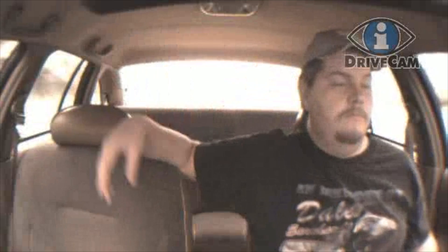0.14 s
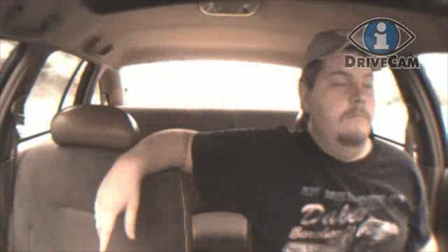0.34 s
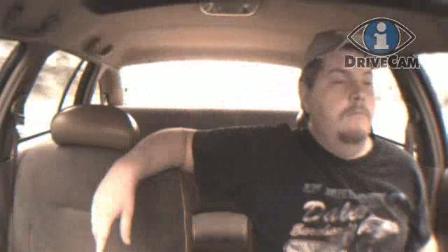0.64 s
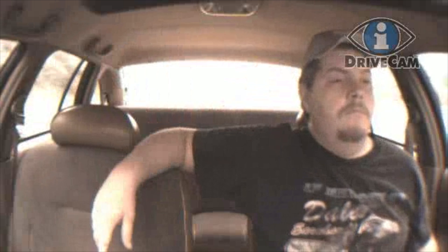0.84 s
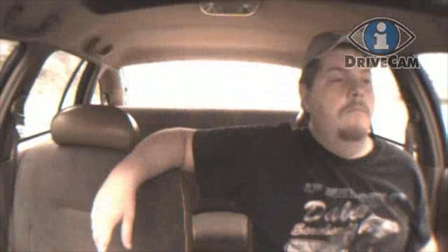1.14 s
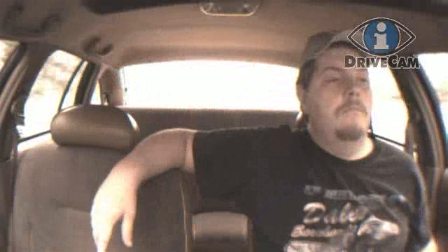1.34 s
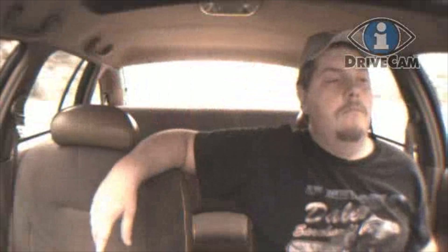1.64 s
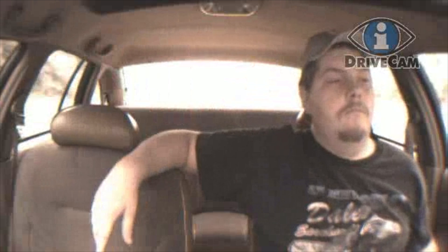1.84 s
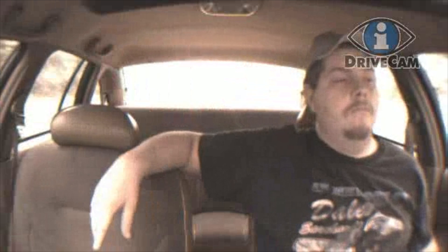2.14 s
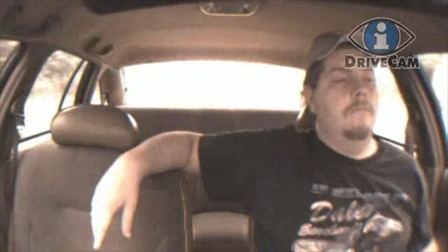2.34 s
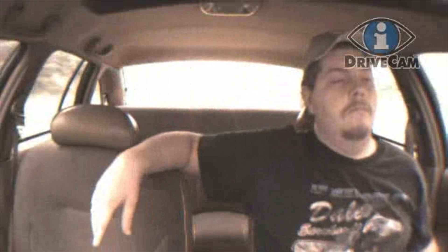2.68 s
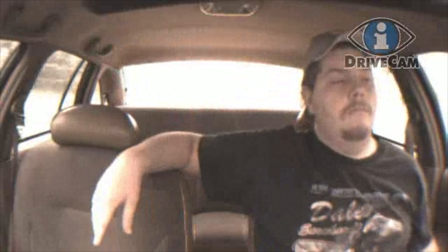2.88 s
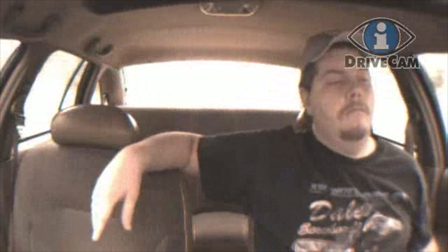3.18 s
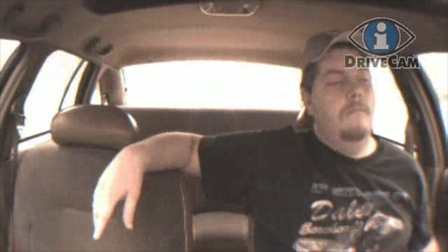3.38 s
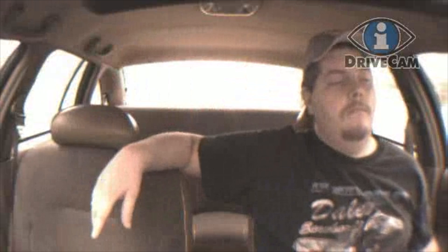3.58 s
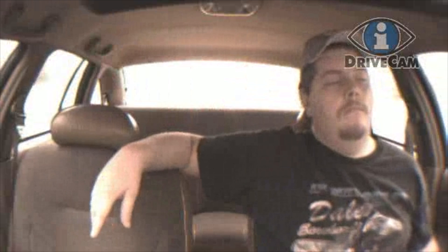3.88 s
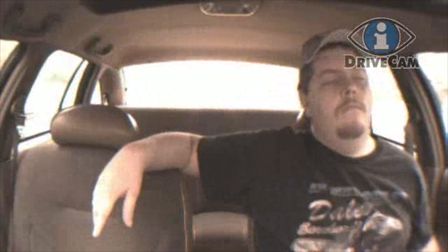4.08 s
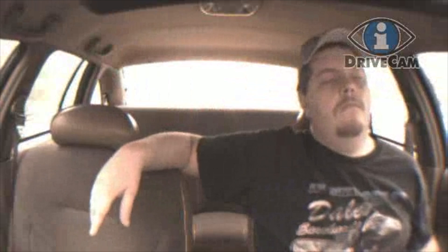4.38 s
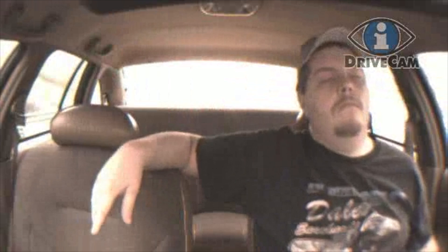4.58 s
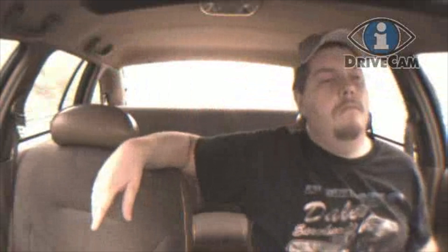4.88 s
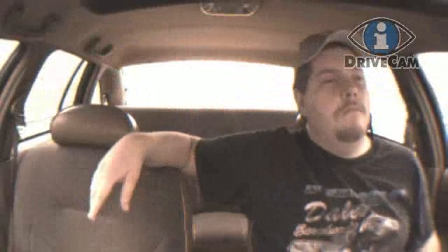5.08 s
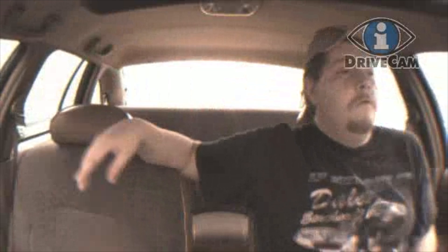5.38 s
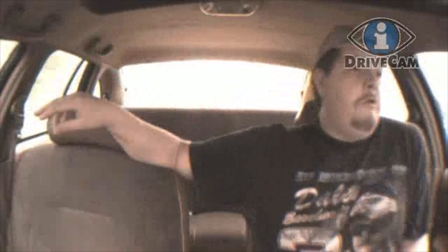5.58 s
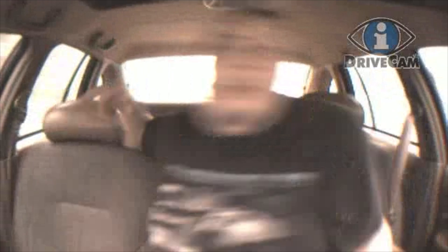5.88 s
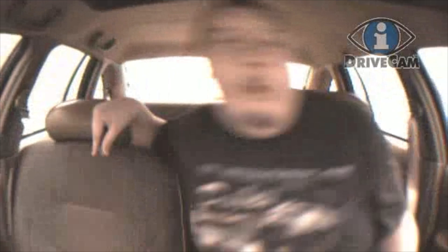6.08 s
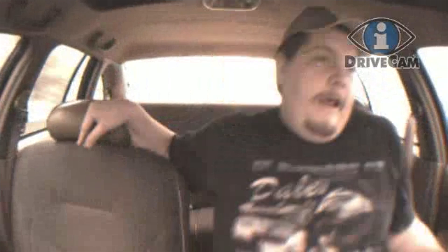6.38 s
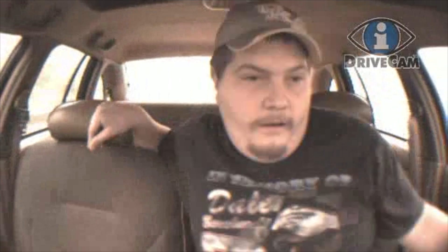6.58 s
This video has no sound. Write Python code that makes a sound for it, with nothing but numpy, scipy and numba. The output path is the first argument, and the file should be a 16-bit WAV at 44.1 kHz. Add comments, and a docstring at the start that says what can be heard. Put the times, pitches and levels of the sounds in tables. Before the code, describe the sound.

From the start, a steady low roar of tyres and wind fills a car cabin, with a faint tread whine. It grows slightly rougher near 4.7 seconds, and loose trim gives a few light knocks at about 5 seconds. At 5.5 seconds the tyres judder into a short squealing skid, loudest just before 5.9 seconds, where the suspension thumps with a small rattle. At about 6.1 seconds a much louder crash hits: metal panels buckle and crunch over a deep groan from the body, with a run of heavy thumps. From 6.2 seconds plastic and metal keep cracking, clacking and scraping, and a last brief tyre chirp comes as the sound ends, at about 6.7 seconds. The microphone is inside the small padded cabin; it sounds close and dull, with little treble, and overloads during the impact.

```python
"""Skid and crash, inside a car

Road roar fills the cabin and the trim knocks. The tyres judder into a short, squealing skid and
the suspension thumps. Then the body is hit and crumples, overloading the microphone: panels
buckle over a groaning shell, and plastic and metal go on cracking, clacking and scraping."""
import sys
import numpy as np
from scipy import signal
from scipy.fft import rfft, irfft
from scipy.io import wavfile
from scipy.ndimage import uniform_filter1d
from numba import njit

SR = 44100
rng = np.random.default_rng(int(sys.argv[2]) if len(sys.argv) > 2 else 0)


def materialize(psi):
    """Save the field psi as 16-bit PCM at rate SR to the path in sys.argv[1].

    A 1-D psi becomes a single channel; in a 2-D psi each row is a channel.
    """
    bounded = np.clip(np.atleast_2d(psi).T, -1, 1)
    quanta = np.round(bounded * 32767).astype(np.int16)
    wavfile.write(sys.argv[1], SR, quanta)


N = 296793
TIME = np.arange(N) / SR
FREQS = np.maximum(np.arange(N // 2 + 1) * SR / N, 1)


def undb(db):
    """Decibels to gain."""
    return 10 ** (np.asarray(db) / 20)


def unit(x):
    """Scale to rms 1."""
    return x / np.sqrt(np.mean(np.abs(x) ** 2))


def noise():
    """White noise."""
    return rng.standard_normal(N)


def wander(rate_hz):
    """Smooth random drift, rms 1."""
    hold = max(int(SR / rate_hz), 1)
    steps = np.repeat(rng.standard_normal(N // hold + 1), hold)
    return unit(uniform_filter1d(steps, hold)[:N])


def grains(rate_hz, spread_db):
    """Random tiny snaps: many small, a few large."""
    size = undb(spread_db * np.minimum(rng.exponential(size=N), 4))
    return unit((rng.random(N) < rate_hz / SR) * size * np.sign(noise()))


def fade(start_s, decay_s):
    """Sudden onset, exponential decay."""
    return (TIME >= start_s) * np.exp(-np.maximum(TIME - start_s, 0) / decay_s)


def swell(start_s, length_s, attack_s, release_s):
    """Builds while a contact lasts, then decays."""
    age_s = np.maximum(TIME - start_s, 0)
    return (1 - np.exp(-age_s / attack_s)) * np.exp(-np.maximum(age_s - length_s, 0) / release_s)


def colour(points):
    """Minimum-phase response from (f/Hz, level/dB) points: rings only after it is struck."""
    hz, db = np.transpose(points)
    gain = undb(np.interp(np.log(FREQS), np.log(hz), db))
    cepstrum = irfft(np.log(gain), N)
    cepstrum[1:N // 2] *= 2
    cepstrum[N // 2:] = 0
    return np.exp(rfft(cepstrum))


def resonance(hz, width_hz):
    """Response of one damped mode."""
    return 1 / (1 + 1j * (FREQS ** 2 - hz ** 2) / (FREQS * width_hz))


def through(x, response):
    """Filter by a frequency response."""
    return signal.fftconvolve(x, irfft(response, N)[:SR // 4])[:N]


@njit
def sweep(x, centre_hz, width_hz):
    """State-variable band-pass with a moving centre."""
    y = np.empty(len(x))
    band_state, low_state = 0., 0.
    for i in range(len(x)):
        g = np.tan(np.pi * centre_hz[i] / SR)
        damping = width_hz / centre_hz[i]
        band = (band_state + g * (x[i] - low_state)) / (1 + g * (g + damping))
        band_state = 2 * band - band_state
        low_state += 2 * g * band
        y[i] = damping * band
    return y


def brighten(x, treble_db, corner_hz=1800):
    """Treble shelf: hard contacts are bright, soft ones dull."""
    bass = signal.lfilter(*signal.butter(1, corner_hz, fs=SR), x)
    return bass + undb(treble_db) * (x - bass)


def cabin(x, wet_db, decay_s):
    """The small padded cabin adds a short spray of reflections."""
    reflections = (noise() * fade(0.0041, decay_s))[:SR // 8]
    return x + undb(wet_db) * signal.fftconvolve(x, reflections / np.linalg.norm(reflections))[:N]


# Cabin roar spectrum: f/Hz, level/dB
ROAR_SPECTRUM = [(12, -10), (48, 0), (80, -1.5), (135, 1.5), (195, -.5), (280, 2), (380, -.5), (450, -4),
                 (750, -3), (1000, -6), (1370, -14.5), (1750, -16), (1950, -21.5), (2550, -23),
                 (2800, -27.5), (3600, -30), (3950, -42.5), (4800, -40)]
# Tread and cabin resonances: f/Hz, width/Hz, level/dB
TREAD_MODES = [(830.2, 14.6, -2), (892, 47, -10), (1054.7, 33, -8.5), (1222, 54, -14.5)]


def road(level_db=-25.5, flutter_db=0.72, tread_db=-10, tread_db_per_s=0.45):
    """Tyre and wind roar, uneven with the surface; the tread sings in narrow bands, slowly growing."""
    rough_stretch_db = 0.95 * swell(4.7, 0.98, attack_s=0.25, release_s=0.3)
    roar = unit(through(noise(), colour(ROAR_SPECTRUM))) * undb(flutter_db * wander(25))
    whine = sum(undb(db) * through(noise(), resonance(hz, 1.32 * width_hz) ** 2)
                for hz, width_hz, db in TREAD_MODES)
    whine = unit(whine) * undb(tread_db + tread_db_per_s * TIME + 0.67 * wander(8.2))
    return (roar + whine) * undb(level_db + rough_stretch_db)


def ring(start_s, db, hz, decay_s):
    """Damped swing of a struck part."""
    return undb(db) * fade(start_s, decay_s) * np.sin(2 * np.pi * hz * (TIME - start_s))


# Trim knocks: t/s, level/dB, f/Hz
TRIM_KNOCKS = [(4.996, -14, 680), (5.0, -9.5, 780), (5.011, -13, 510), (5.018, -17, 790), (5.089, -16, 604),
               (5.096, -11, 410)]


def trim(rattle_db=-31):
    """Loose trim knocks, and rattles at the first chassis thump."""
    knocks = sum(ring(t, db, hz, decay_s=0.0021) for t, db, hz in TRIM_KNOCKS)
    rattle = unit(through(noise(), resonance(1700, width_hz=1800) ** 2))
    shake = swell(5.845, 0.016, attack_s=0.005, release_s=0.012)
    return knocks + undb(rattle_db) * shake * rattle


# Chassis thumps: t/s, level/dB, f/Hz, decay/s
CHASSIS_THUMPS = [(5.85, 3.5, 101, 0.0077), (6.11, 4.5, 157.5, 0.018), (6.16, 5.5, 198.3, 0.032),
                  (6.22, 6, 72, 0.016), (6.263, 1, 52.7, 0.031), (6.284, -0.5, 222, 0.0224),
                  (6.302, 1, 136.7, 0.023), (6.361, -9, 86, .014), (6.4576, 0, 165, 0.0039),
                  (6.586, -13, 200, 0.005)]


def chassis(push_s=0.0041):
    """Heavy thumps, their onsets softened by the springs."""
    return sum(ring(t, db, hz, decay_s) * (1 - fade(t, push_s)) for t, db, hz, decay_s in CHASSIS_THUMPS)


# Tyre slides: t/s, length/s, level/dB, f/Hz, glide/(Hz/s), judder share/0-1
TYRE_SLIDES = [(5.522, 0.12, -25, 836, 599, 0.3), (5.629, 0.22, -16.5, 903, -900, 0.69),
               (5.847, 0.035, -13.5, 727, -300, 0.7), (5.918, 0.15, -26, 790, 1104, 0.05),
               (6.658, 0.08, -21, 770, 900, 1)]


def skid(judder_hz=133.4, squeal_hz=787.0, tone_band_hz=300, squeal_width_hz=210.0,
         hum_db=-9, scrub_db=-30, shudder_db=1.5, rough_db=2):
    """Sliding rubber squeals in a band that glides with load; judder breaks it into clear tones."""
    force, centre_hz, judder = np.zeros(N), np.full(N, squeal_hz), np.zeros(N)
    for t, length_s, db, hz, hz_per_s, share in TYRE_SLIDES:
        force = np.maximum(force, undb(db) * swell(t, length_s, attack_s=0.035, release_s=0.018))
        centre_hz = np.where(TIME < t, centre_hz, hz + hz_per_s * np.minimum(TIME - t, length_s))
        judder = np.where(TIME < t, judder, share)
    # Slips slow slightly as the squeal sinks.
    slip_hz = judder_hz * (centre_hz / squeal_hz) ** 0.04 * (1 + 0.011 * wander(90))
    phase = 2 * np.pi * np.cumsum(slip_hz) / SR
    tones = np.zeros(N)
    for k in range(3, 11):
        harmonic = np.sin(k * phase + rng.uniform(0, 2 * np.pi))
        detuning = 2 * (k * slip_hz - centre_hz) / tone_band_hz
        tones += harmonic * undb(shudder_db * wander(40)) / (1 + detuning ** 2)
    hum = np.sin(phase) + np.sin(2 * phase)  # judder shakes the cabin
    squeal = sweep(noise(), centre_hz, squeal_width_hz)
    squeal = unit(sweep(squeal, centre_hz, 2 * squeal_width_hz))
    scrub = unit(through(noise(), resonance(2000, width_hz=2500)))
    rubber = np.sqrt(judder) * (tones + undb(hum_db) * hum) + np.sqrt(1 - judder) * squeal
    return (rubber + undb(scrub_db) * scrub) * force * undb(rough_db * wander(50))


# Loose-part strikes: t/s, level/dB, pitch ratio
PART_STRIKES = [(6.2411, 7, 1.2), (6.2925, 7.5, 1), (6.347, -6, 0.92), (6.4262, 3, 0.91),
                (6.459, 5.5, 1.07), (6.5492, 5.5, 1.1), (6.606, 2, .88), (6.623, 1, 0.57),
                (6.637, 5.5, 0.8)]
# Loose-part modes at ratio 1: f/Hz, width/Hz, level/dB
PART_MODES = [(930, 86, -11), (1640, 65, 1.5), (2260, 120, -0.5), (3000, 120, 2), (4200, 140, -15)]


def clacks(gain_db=-15):
    """Each loose hard part hits the trim once and rings briefly at its own pitch."""
    hits, age_s = np.zeros(N), TIME[:SR // 16]
    for t, db, ratio in PART_STRIKES:
        onset = int(t * SR)
        for hz, width_hz, mode_db in PART_MODES:
            envelope = undb(gain_db + db + mode_db) * np.exp(-np.pi * width_hz * age_s)
            hits[onset:onset + len(age_s)] += envelope * np.sin(2 * np.pi * hz * ratio * age_s)
    return cabin(hits, wet_db=-7, decay_s=0.0098)


# Single fractures: t/s, level/dB, decay/s, treble/dB
FRACTURES = [(6.072, 3, 0.0074, -10), (6.115, 2, 0.005, -2), (6.195, -12, 0.011, 13),
             (6.239, -4.5, 0.013, 14.5), (6.263, 2, 0.0062, 0), (6.283, -1.5, 0.017, 4.5),
             (6.309, -0.5, 0.016, -7), (6.331, -4, 0.0062, 1), (6.343, -2.5, 0.011, -7),
             (6.371, -1, 0.006, -2), (6.4267, -9, 0.0041, 16.5), (6.454, 2, 0.012, -3),
             (6.488, -3.5, 0.014, -18), (6.524, -2, 0.022, 5.5), (6.547, -10, 0.0075, 13),
             (6.583, -0.5, 0.008, -3), (6.602, -2.5, 0.0087, 9.5), (6.621, 2.5, 0.0096, -4.5),
             (6.636, -3.5, 0.0046, 10.5), (6.683, -15, 0.017, 6)]


def fractures(gain_db=-6):
    """Each break is a fast-dying burst of splinters."""
    splinters, force = grains(rate_hz=10000, spread_db=0.5), np.zeros(N)
    for t, db, decay_s, treble_db in FRACTURES:
        span = slice(int(t * SR), int(t * SR) + SR // 10)
        burst = splinters[span] * np.exp(-(TIME[span] - t) / decay_s)
        force[span] += undb(db + gain_db) * brighten(burst, treble_db)
    return force


# Ringing bands that colour the crunch: f/Hz, width/Hz, level/dB
CRUNCH_BANDS = [(403, 24, -10.5), (648, 25, -9.5), (882, 92, -21), (1200, 70, -17), (1477, 70, -13),
                (1898, 29, -14), (2400, 40, -21.5), (2750, 80, -15), (3350, 150, -14), (4190, 390, -16)]
# Spectrum of breaking parts: f/Hz, level/dB
BREAK_SPECTRUM = [(60, -21), (200, -2), (400, 5.5), (900, 5), (1400, 0.5), (2000, -6), (3200, -8),
                  (4600, -17), (6000, -37.5)]


def crunch(force, ring_db=11, broad_db=-1, waver=0.02, waver_hz=14):
    """Each snap takes a broad colour and rings in narrow bands; the bands waver slightly in pitch."""
    ringing = sum(undb(db) * sweep(force, hz * (1 + waver * wander(waver_hz)), float(width_hz))
                  for hz, width_hz, db in CRUNCH_BANDS)
    broad = through(force, unit(colour(BREAK_SPECTRUM)))
    return undb(broad_db) * broad + undb(ring_db) * ringing


# Collision and later blows: t/s, length/s, buckle level/dB, groan level/dB
BLOWS = [(6.068, 0.14, 1.5, 2), (6.277, 0.019, -6, 2), (6.452, 0.0084, -11.5, -17),
         (6.524, 0.078, -13.5, -23)]


def crushing(scrape_db=-14, slide_groan_db=-16, slide_decay_s=1.26):
    """Buckle and groan envelopes: the blows and the wreck's slowing slide add in power."""
    buckle, groan = [], []
    for t, length_s, buckle_db, groan_db in BLOWS:
        buckle.append(undb(buckle_db) * swell(t, length_s, attack_s=0.007, release_s=0.04))
        # The heavy shell is slower to start.
        groan.append(undb(groan_db) * swell(t, length_s, attack_s=0.026, release_s=0.024))
    sliding = fade(BLOWS[0][0], slide_decay_s)
    buckle.append(undb(scrape_db) * sliding)
    groan.append(undb(slide_groan_db) * sliding ** 2)  # settles before the scraping
    return np.linalg.norm(buckle, axis=0), np.linalg.norm(groan, axis=0)


# Groaning shell spectrum: f/Hz, level/dB
SHELL_SPECTRUM = [(20, -5.5), (45, 6.5), (75, 0), (160, 4), (280, 2), (500, -5.5), (1000, -18.5),
                  (3000, -54)]


def wreck(scrape_treble_db=-7, tear_treble_db=5):
    """Panels buckle in ragged runs of snaps over a groaning shell; snaps and fractures crunch."""
    buckle, groan = crushing()
    ragged_db = 3 * np.minimum(buckle + 0.3, 1)
    snaps = grains(rate_hz=3000, spread_db=3.5) * buckle * undb(ragged_db * wander(140))
    snaps = brighten(snaps, np.interp(buckle, [0, 1], [scrape_treble_db, tear_treble_db]))
    metal = cabin(crunch(snaps + fractures()), wet_db=-11, decay_s=0.021)
    shell = unit(through(noise(), colour(SHELL_SPECTRUM)))
    return metal + groan * shell


def scene():
    """Mono sum at the microphone."""
    return (road() + skid() + trim() + chassis() + wreck() + clacks())[None]


def saturate(x, top, knee):
    """Flatten peaks at top; a higher knee is harder."""
    return x / (1 + np.abs(x / top) ** knee) ** (1 / knee)


def record(dry, band_hz=4750, hiss_hz=5950, hiss_db=-56.5, dc_offset=0.029, top_hz=15800):
    """Soft input overload, low-pass, faint hiss, off-centre clipping at full scale, final low-pass."""
    overloaded = saturate(dry, top=1.13, knee=5)
    narrow = signal.sosfiltfilt(signal.ellip(8, 0.2, 40, band_hz, fs=SR, output="sos"), overloaded)
    hiss = unit(signal.sosfilt(signal.ellip(8, 0.5, 70, hiss_hz, fs=SR, output="sos"), noise()))
    clipped = saturate(narrow + undb(hiss_db) * hiss + dc_offset, top=1, knee=30)
    return signal.sosfiltfilt(signal.ellip(10, 0.02, 50, top_hz, fs=SR, output="sos"), clipped)


dry = scene()
out = record(dry)
materialize(out)
```